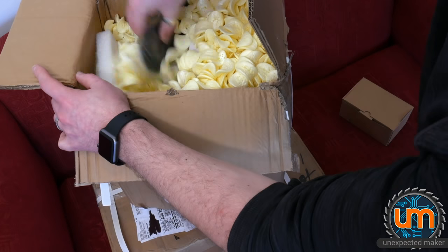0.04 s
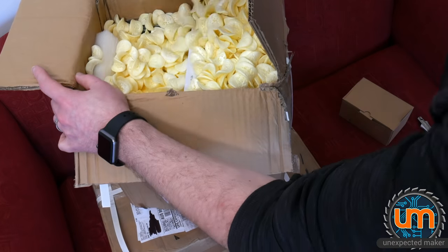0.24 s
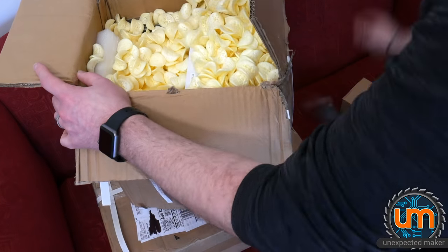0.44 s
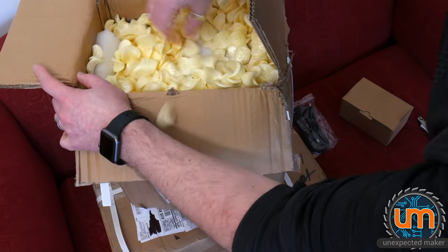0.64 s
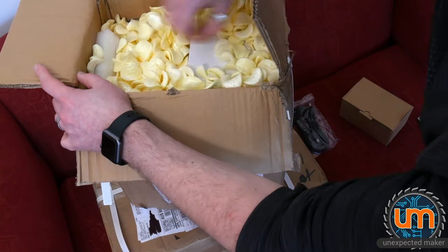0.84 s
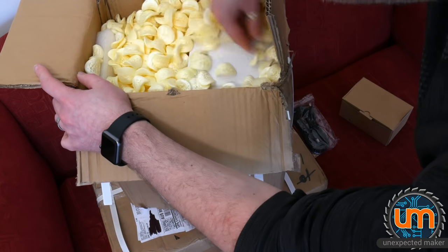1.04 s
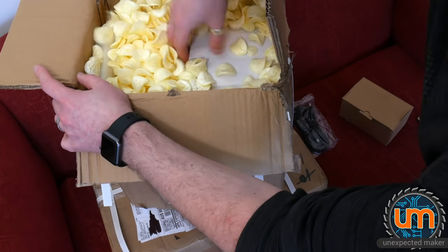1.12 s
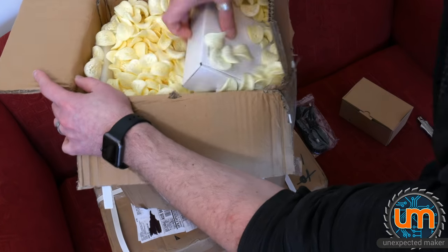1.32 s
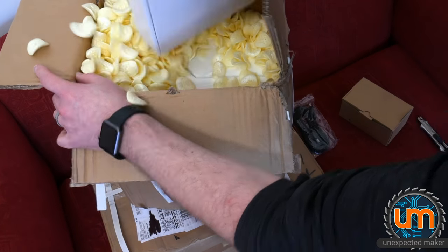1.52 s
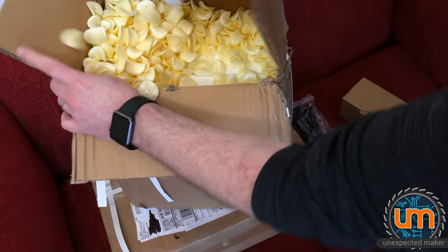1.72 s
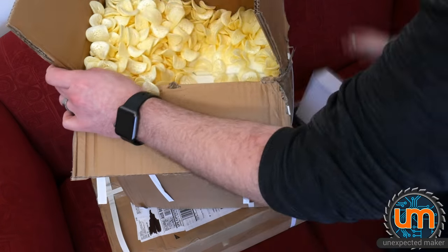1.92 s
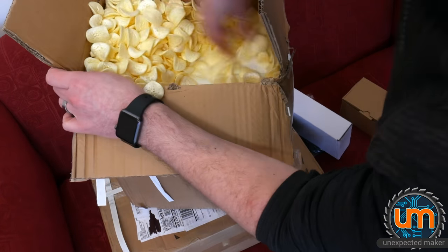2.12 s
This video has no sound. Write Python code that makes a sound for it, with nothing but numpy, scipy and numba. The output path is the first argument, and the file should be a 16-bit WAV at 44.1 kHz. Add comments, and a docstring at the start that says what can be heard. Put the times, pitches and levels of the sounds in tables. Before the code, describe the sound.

Foam packing peanuts rustle and crunch dryly as a hand digs through a cardboard box

```python
"""A dense, dry rustle of foam packing peanuts runs throughout: a hand digs in a cardboard box and pulls out a foam block.
The stereo microphone is close, in a quiet room. The rustle is thousands of tiny contacts, each ringing briefly.
Over it stand ticks (close partials and a bright crack), knocks (ringing modes of the cardboard)
and one squeak of foam on foam (a chattering sine). Filtered noise makes the room's hush and the walls' reverberation."""
import sys
import numpy as np
from scipy import signal
from scipy.fft import rfft, irfft, next_fast_len
from scipy.io import wavfile
from scipy.ndimage import uniform_filter1d
from numba import njit

SR = 44100
rng = np.random.default_rng(int(sys.argv[2]) if len(sys.argv) > 2 else 0)


def unload_wav(signal):
    """Save mono or channel-first audio to the path in sys.argv[1] as 16-bit WAV at rate SR, clipped to [-1, 1]."""
    wavfile.write(
        sys.argv[1],
        SR,
        np.round(np.clip(np.atleast_2d(signal).T, -1, 1) * 32767).astype(np.int16),
    )


N = 95697  # samples


def amp(db):
    """Amplitude ratio of a level in dB."""
    return 10 ** (np.asarray(db) / 20)


def read(table, hz):
    """Level in dB of a spectrum table at given frequencies, interpolated over log frequency."""
    points = np.array(table, float)
    return np.interp(np.log(hz + 1), np.log(points[:, 0]), points[:, 1])


def colour(x, table):
    """Filter a signal by a spectrum table, leaving its phase alone."""
    n = next_fast_len(N + 2048)
    hz = np.arange(n // 2 + 1) * SR / n
    return irfft(rfft(x, n) * amp(read(table, hz)), n)[:N]


def tail(t60):
    """Exponentially decaying noise of unit energy, falling 60 dB in t60 seconds."""
    t = np.arange(SR // 2) / SR
    h = rng.standard_normal(SR // 2) * np.exp(-np.log(1000) * t / t60)
    return h / np.sqrt(np.sum(h ** 2))


def walk(rate):
    """Random levels, rate of them per second, joined by slopes; spread near 1."""
    hold = int(SR / rate)
    steps = np.repeat(rng.standard_normal(N // hold + 1), hold)
    return 1.54 * uniform_filter1d(steps, hold)[:N]


@njit
def ring(n, sr, start, hz, t60, size):
    """Sum of decaying sines, each the turning of a shrinking complex number."""
    y = np.zeros(n)
    for k in range(len(start)):
        turn = np.exp((2j * np.pi * hz[k] - np.log(1000.) / t60[k]) / sr)
        z, first = size[k] + 0j, int(start[k] * sr)
        for i in range(max(first, 0), min(n, first + int(t60[k] * sr))):
            y[i] += z.imag
            z *= turn
    return y


# Colour of the quiet room at the microphone. Each row: frequency in Hz, relative density in dB per Hz.
ROOM_COLOUR = [(20, -1.5), (50, -2.5), (85, 3), (130, -8), (250, -11.5), (1100, -12.5), (2760, -11.5),
               (15500, -24.5)]
ROOM_DB = -57  # RMS, dB re full scale


def room():
    """Steady hush of the room: coloured noise at a fixed level."""
    hush = colour(rng.standard_normal(N), ROOM_COLOUR)
    return hush / np.std(hush) * amp(ROOM_DB)


WALLS_T60_S, WALLS_DB = .2, -13  # reverberation time; its energy relative to the direct sound
NEAR_LOW_HZ = 173  # corner of the bass cut on the near sounds


def in_room(near, walls):
    """Near sound with its wall reverberation, cut in the bass, over the room's hush."""
    bass_cut = signal.butter(N=3, Wn=NEAR_LOW_HZ, btype="high", fs=SR, output="sos")
    reverberation = amp(WALLS_DB) * signal.fftconvolve(near, walls)[:N]
    return signal.sosfilt(bass_cut, near + reverberation) + room()


# Foam rubbing on foam, close by. Each row: time in seconds, centre pitch in Hz, mean amplitude in dB.
SQUEAK_PATH = [(1.3, 3950, -44), (1.34, 4000, -32), (1.364, 4020, -26.5), (1.385, 4130, -25.5),
               (1.395, 4150, -40), (1.41, 4200, -53)]
CHATTER_HZ, CHATTER_DEPTH = 105, 0.56  # depth as a share of the mean amplitude


def squeak():
    """A high stick-slip tone with an unsteady pitch, whose amplitude chatters."""
    t = np.arange(N) / SR
    s, pitch_hz, level_db = np.array(SQUEAK_PATH).T
    hz = np.interp(t, s, pitch_hz) * (1 + 0.0118 * walk(250))
    chatter = 1 + CHATTER_DEPTH * np.sin(2 * np.pi * CHATTER_HZ * (t - 1.353))
    level = amp(np.interp(t, s, level_db, -120, -120))
    return level * chatter * np.sin(2 * np.pi * np.cumsum(hz) / SR)


# Knocks on the box, close by. Each row: listed time in seconds, just before the knock sounds,
# relative level in dB, pitch in Hz.
BOX_KNOCKS = [(0.44, -33, 706), (0.535, -22.5, 564), (0.781, -26, 1385), (0.839, -28, 870),
              (0.882, -27.5, 465), (1.022, -39, 844), (1.168, -23, 680), (1.461, -34.5, 300),
              (1.531, -34.5, 1000), (1.669, -35, 930), (1.693, -25.5, 620), (1.772, -27.5, 582),
              (1.802, -23, 1035), (1.848, -25, 820), (1.903, -27, 646), (1.934, -28, 1570),
              (1.976, -25.5, 1540)]
# Modes of the cardboard. Each row: multiple of the knock's pitch, relative level in dB, T60 in seconds.
BOX_MODES = [(.55, -8, 0.038), (1, 1.5, 0.031), (1.45, -0.5, 0.021), (2.1, -1.5, 0.015), (3.2, -1, 0.0093)]
KNOCK_DELAY_S = 0.002966  # added to every listed time


def knocks():
    """Each knock rings the cardboard's modes, scaled to its pitch."""
    s, db, hz = np.array(BOX_KNOCKS, float).T
    out = np.zeros(N)
    for k, (multiple, mode_db, t60) in enumerate(BOX_MODES):
        size = (-1) ** k * amp(db + mode_db - 5.5)  # neighbouring modes start in opposite directions
        out += ring(N, 1. * SR, s + KNOCK_DELAY_S, hz * multiple, 0 * s + t60, size)
    return out


# Single peanuts close by. Each row: start in seconds, relative level in dB, pitch in Hz,
# brightness in dB (relative level of the crack against the ring).
PEANUT_TICKS = [(0.1836, -25, 4260, -5), (0.374, -26.5, 2480, -10), (0.401, -34, 2440, -2),
                (0.4476, -23.5, 2660, -10), (0.4574, -28, 3010, -10), (0.4931, -26.5, 3860, -4),
                (0.5074, -27.5, 2040, -5), (0.8418, -21, 6740, -16), (0.846, -18.5, 7150, -7),
                (0.8919, -17, 2710, -18), (0.9396, -18.5, 3520, -10), (1.038, -25.5, 3500, -12),
                (1.0447, -24, 2360, -20), (1.0591, -30.5, 6900, -15), (1.0816, -34, 6100, -8.5),
                (1.103, -38, 2670, -12), (1.1284, -43, 3300, -12), (1.1387, -27, 2100, -8),
                (1.1574, -20, 2560, -8), (1.6023, -38.5, 2130, -6), (1.6707, -21.5, 6900, -10),
                (1.737, -17, 2740, -22), (1.7568, -12, 5660, -15), (1.7734, -20, 5830, -20),
                (1.7751, -14.5, 2450, -11), (1.8035, -14, 2850, -11), (1.8517, -14, 2810, -20),
                (1.8936, -15.5, 2660, -9), (1.9365, -12, 2180, -19), (2.0918, -35.5, 2300, 2)]
TICK_T60_S, CRACK_T60_S = .018, .008
TICK_SPREAD = 0.397  # widest range of a tick's partials, as a share of its pitch


def ticks():
    """A short ring of a few close partials and a bright crack for each tick."""
    s, db, hz, bright_db = np.array(PEANUT_TICKS, float).T[:, :, None]
    draws = rng.random((len(s), 20))
    near, crack = draws[:, :4], draws[:, 4:]  # 4 partials and 16 crack sines a tick

    partial_s = s + .0008 * near[:, ::-1]
    # the first partial holds the pitch, later ones may stray further
    partial_hz = hz * (1 + TICK_SPREAD * (near - .5) * np.linspace(0, 1, near.shape[1]))
    partial_size = amp(db - 13) + 0 * near
    body = ring(N, 1. * SR, partial_s.ravel(), partial_hz.ravel(),
                np.full(near.size, TICK_T60_S), partial_size.ravel())

    crack_s = s + 0.00037 * crack[:, ::-1]
    crack_hz = 1500 + 13500 * crack
    crack_size = amp(db + bright_db - 9) + 0 * crack
    return body + ring(N, 1. * SR, crack_s.ravel(), crack_hz.ravel(),
                       np.full(crack.size, CRACK_T60_S), crack_size.ravel())


# The hand's digging, close to the microphone. Each row: time in seconds, relative rustle level in dB,
# then box rumble, scrape and treble in dB relative to the rustle (each used about its column's mean).
DIGGING = [(0, -40, 3, 4.5, -1), (.068, -46.5, 3.5, -0.5, -3.5), (.115, -40.5, 1.5, 2.5, -2.5),
           (.15, -45.5, 2.5, 6.5, -1), (.185, -43, 0.5, 5, 1.5), (.26, -48, 5.5, -4.5, -10.5),
           (.39, -46, -1, -1.5, -12), (.5, -43.5, -5, 0, -8.5), (.56, -44, -2.5, -2, -8.5),
           (.69, -45.5, -6.5, 0.5, -4), (.71, -39, -4, 0, -4.5), (.78, -41, -8, 5, 3),
           (.846, -40.5, 0.5, 7, 7), (.876, -42.5, 0, 1.5, 0), (.894, -34.5, -10, -8, -15),
           (.905, -46, -7, 0, -4), (.95, -47, -1, 0, -7), (1.01, -54, 0, -5, -11),
           (1.045, -53, -8, -5, -16), (1.07, -58.5, -2, -1, -5), (1.136, -63, 2, 3, -10),
           (1.14, -50, 3, -2, -6), (1.162, -40, -4, 2.5, -1.5), (1.189, -44.5, -3, 5.5, 0.5),
           (1.211, -35, -17.5, 1, -4.5), (1.245, -35, -16, 3.5, -3), (1.27, -37, -11, 5.5, 2),
           (1.331, -37.5, -8, 2, 4), (1.365, -34.5, -12.5, 4.5, 3), (1.427, -41, -5, 11, 7.5),
           (1.505, -48.5, -2, 3.5, -5.5), (1.595, -60, 6.5, 2, -4.5), (1.667, -67, -1, -3, -8),
           (1.671, -42, 6, 2, 7), (1.685, -36, -11, -2, -1.5), (1.755, -34.5, -15, 1, -3),
           (1.813, -38.5, -2, 2, -2), (1.891, -36.5, -9, 0.5, -6), (1.923, -40.5, 7, 6, 2),
           (1.94, -32.5, -6, -1, -7), (1.957, -42, -5, 1, -2.5), (1.984, -36.5, -4, 0.5, -3),
           (2.035, -50.5, -3.5, -2, -7), (2.17, -58, 3.5, 0, -9)]
# Centres in Hz of four bands: box rumble, the plain rustle, scrape, treble.
DIGGING_HZ = (700, 2600, 5500, 11000)
# Colour of the contacts. Each row: frequency in Hz, relative density in dB per Hz.
FOAM_COLOUR = [(120, -43), (200, -13.5), (315, -10.5), (358, -8), (515, -4.5), (1050, -4.5), (1260, -5),
               (1590, -5), (1710, -5.5), (2700, 1.5), (3610, -5.5), (4180, -0.5), (4920, -7), (6710, -1),
               (8050, -7.5), (13900, -12.5), (15500, -28)]
CONTACTS_PER_S = 30000
RING_CYCLES = 37.5  # middle T60 of a contact, in cycles of its pitch
RING_SPREAD = 2.37  # most cycles over fewest
RUSTLE_DB, SCATTER_DB, CLUMP_DB = -6, 2.8, 1.  # whole rustle; scale of the scatter in size; of the clumping


def rustle(clumps):
    """Dense contacts, each with its own pitch and size, clumped in time; the digging sets their level."""
    dig = np.array(DIGGING)
    when, pitch, rarity, sign, length = rng.random((CONTACTS_PER_S * N // SR, 5)).T
    t = when * N / SR
    hz = 16000 * (.11 + .89 * pitch) ** 2
    # low contacts are more crowded and ring longer: the tilt evens this out
    tilt_db = 15 * np.log10(hz / 3000)
    db = np.interp(t, dig[:, 0], dig[:, 1]) + read(FOAM_COLOUR, hz) + tilt_db
    for column, share in ((2, [1, 0, 0, 0]), (3, [0, 0, 1, 0]), (4, [0, 0, 0, 1])):
        band_db = np.interp(t, dig[:, 0], dig[:, column] - dig[:, column].mean())
        db = db + np.interp(np.log(hz), np.log(DIGGING_HZ), share) * band_db
    db = db + SCATTER_DB * np.minimum(-np.log(rarity), 3.5)  # a few contacts are much louder
    db = db + CLUMP_DB * clumps[(t * SR).astype(int)]
    t60 = RING_CYCLES * RING_SPREAD ** (length - .5) / hz
    return ring(N, 1. * SR, t, hz, t60, amp(db + RUSTLE_DB) * np.sign(sign - .5))


# Stereo width at the microphone. Each row: frequency in Hz, gain of the unlike sound in the side in dB.
STEREO_WIDTH = [(60, -9), (200, -7), (700, -10), (1500, -8.5), (2300, -29.5), (5500, -22.5), (8000, -5),
                (15000, 1)]
# Pull to the left. Each row: frequency in Hz, gain of the mid sound copied to the side in dB.
LEFT_LEAN = [(60, -24), (250, -18), (1000, -34), (4000, -45), (7000, -30), (9000, -14), (14000, -9)]
SPREAD_T60_S = 0.011  # smear that makes the hits differ between mid and side


def scene():
    """Mix the near sounds in the room and hear them at two microphone ports, left and right."""
    clumps = walk(59.75)
    hits = ticks() + knocks() + squeak()
    walls = tail(WALLS_T60_S)
    mid = in_room(rustle(clumps) + hits, walls)
    # the two microphone ports hear unlike mixes of contacts in the bass and treble
    smeared_hits = signal.fftconvolve(hits, tail(SPREAD_T60_S))[:N]
    apart = in_room(rustle(clumps) + smeared_hits, walls)
    side = colour(apart, STEREO_WIDTH) + colour(mid, LEFT_LEAN)
    return np.array([mid + side, mid - side])


TOP_HZ = 15600


def record(dry):
    """The recorder cuts the top with a steep low-pass."""
    top_cut = signal.ellip(10, .2, 80, TOP_HZ, fs=SR, output="sos")
    return signal.sosfilt(top_cut, dry)


dry = scene()
out = record(dry)
unload_wav(out)
```